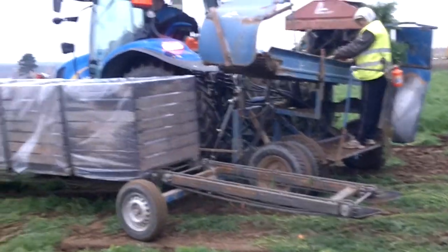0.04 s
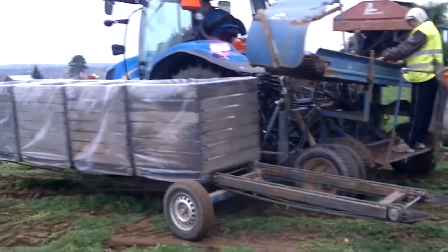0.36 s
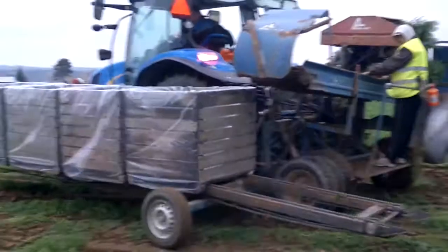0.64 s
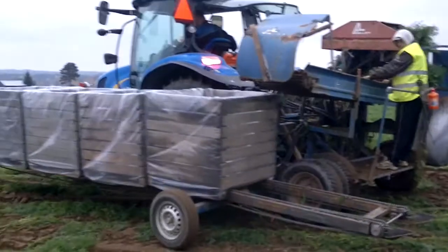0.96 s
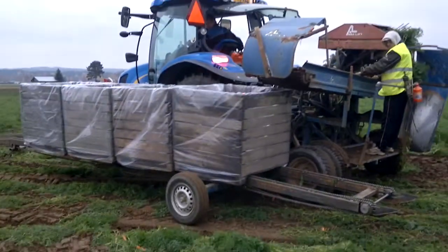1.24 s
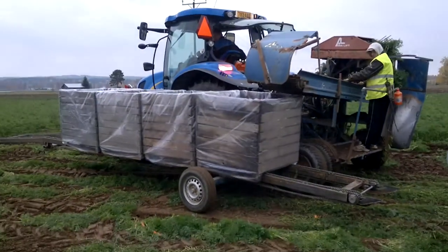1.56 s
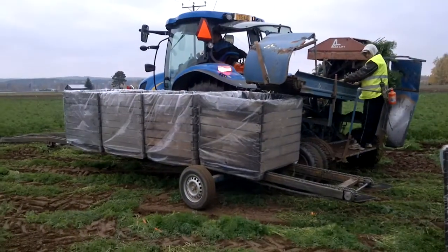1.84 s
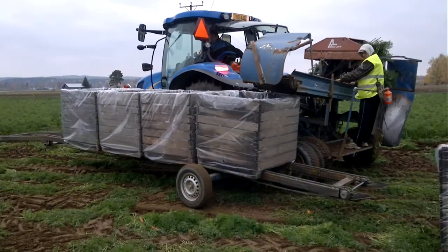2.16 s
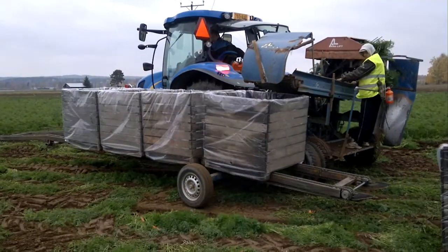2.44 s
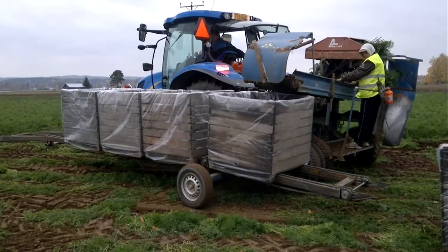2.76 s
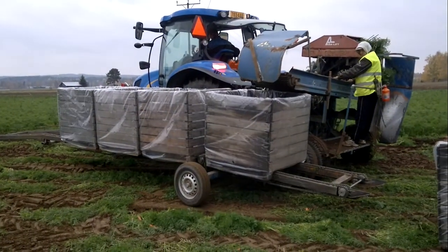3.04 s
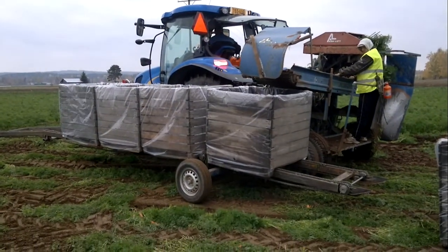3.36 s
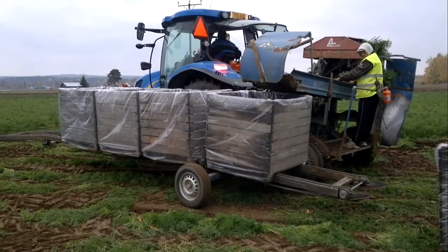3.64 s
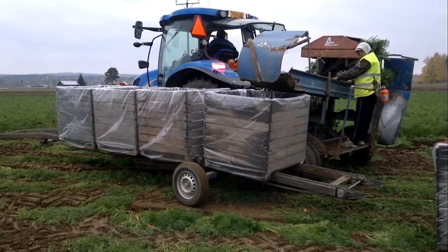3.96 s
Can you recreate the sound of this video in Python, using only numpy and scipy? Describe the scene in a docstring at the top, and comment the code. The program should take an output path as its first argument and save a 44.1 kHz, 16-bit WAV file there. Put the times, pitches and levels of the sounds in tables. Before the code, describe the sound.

A tractor's diesel engine idles and clatters while gusts of wind buffet the microphone.

```python
"""Idling tractor in a gusty field

A few metres away a diesel throbs and clatters, and the belts of its mounted harvester hiss.
Shaken by the engine, a loose steel part chatters and clinks; a clank and two dry ticks join in.
Gusts rumble and buffet on the two microphone ports, mostly on the right one."""
import sys
import numpy as np
from scipy import signal
from scipy.fft import irfft
from scipy.io import wavfile
from scipy.ndimage import uniform_filter1d

SR = 44100
rng = np.random.default_rng(int(sys.argv[2]) if len(sys.argv) > 2 else 0)


def file_out(sig):
    """Save sig as 16-bit WAV at sys.argv[1]."""
    # one column per channel
    cols = np.atleast_2d(sig).T
    # limit, then scale
    lim = np.clip(cols, -1, 1)
    pcm = np.round(lim * 32767).astype(np.int16)
    wavfile.write(sys.argv[1], SR, pcm)


N = 176400
T = np.arange(N) / SR

# The machine's fader moves. Each row: time in seconds, engine clatter in dB, belt hiss in dB.
MACHINE_LEVELS = [(0, -38.5, -43), (0.599, -39, -45.5), (1.2, -34, -41.5), (1.45, -42.5, -46),
                  (1.8, -48.5, -57.5), (2.251, -39, -44.5), (2.8, -39.5, -49.5), (3.6, -42, -52),
                  (4.0, -41.5, -52.5)]


def from_db(db):
    """Decibels to gain."""
    return 10 ** (np.asarray(db) / 20)


def rms_one(x):
    """Scale to unit rms."""
    return x / np.sqrt(np.mean(x ** 2) + 1e-20)


def automation(points):
    """Join (seconds, value) points by straight lines."""
    return np.interp(T, *np.transpose(points))


def at_hz(points, hz):
    """Read a curve on a log-frequency axis."""
    freqs, values = np.transpose(points)
    return np.interp(np.log(hz), np.log(freqs), values)


def drift(rate_hz):
    """Smooth random modulation with a spread of 1."""
    pole = np.exp(-80 * np.pi * rate_hz / SR)
    white = rng.standard_normal(N // 40 + 2002)
    slow = signal.lfilter([1], [1, -2 * pole, pole * pole], white)[2000:]
    return np.interp(np.arange(N) / 40, np.arange(len(slow)), rms_one(slow))


def decay(start, t60):
    """Envelope that jumps to 1, then falls 60 dB in t60 seconds."""
    return (T >= start) * np.exp(-np.log(1000) * np.maximum(T - start, 0) / t60)


def level_out(noise, samples):
    """Ride the gain to take the chance swells out of a noise."""
    return noise / np.sqrt(uniform_filter1d(noise * noise, samples) + 1e-12)


def bands(spectrum, white):
    """Split two white noises into (Hz, band) pairs shaped by a spectrum; total power 1."""
    edges = np.geomspace(20, 16000, 27)
    centres = np.sqrt(edges[1:] * edges[:-1])
    octaves_above = np.maximum(np.log2(centres / spectrum[-1][0]), 0)
    octaves_below = np.maximum(np.log2(spectrum[0][0] / centres), 0)
    density_db = at_hz(spectrum, centres) - 24 * (octaves_above + octaves_below)
    gains = from_db(density_db) * np.sqrt(np.diff(edges))
    gains = gains / np.linalg.norm(gains)
    for k, hz in enumerate(centres):
        if gains[k] > 1e-4:
            bandpass = signal.butter(3, edges[k:k + 2], "band", fs=SR, output="sos")
            yield hz, gains[k] * rms_one(signal.sosfilt(bandpass, white[k % 2]))


def stereo_noise(spectrum, white):
    """Machine noise, centred in the lows and wide higher up."""
    # Stereo image. Each row: frequency in Hz, left-right correlation from -1 to 1.
    correlation = [(700, 0.92), (1200, 0.58), (2000, -0.59), (6500, 0.0094)]
    noise = 0
    for hz, (mid, side) in bands(spectrum, white):
        alike = at_hz(correlation, hz)
        noise += np.sqrt((1 + alike) / 2) * mid + np.sqrt((1 - alike) / 2) * side * [[1], [-1]]
    return noise


def ring(start, hz, t60):
    """One decaying mode, struck with a short contact."""
    contact_s = 0.00029
    attack = np.clip((T - start) / contact_s, 0, 1) ** 2
    return attack * decay(start, t60) * np.sin(2 * np.pi * hz * (T - start))


def dense_modes(spectrum, modes_per_hz=0.032):
    """Many close steel modes at random pitches, each with its own phase on either side."""
    hz = np.arange(N // 2 + 1) * SR / N
    in_range = (hz > spectrum[0][0]) & (hz < spectrum[-1][0])
    present = in_range & (rng.random(len(hz)) < modes_per_hz * SR / N)
    gains = present * from_db(at_hz(spectrum, hz + 1))
    phases = np.exp(2j * np.pi * rng.random((2, len(hz))))
    return rms_one(irfft(gains * phases, N))


def port_rumble(gusts):
    """Turbulence on one port: louder gusts are brighter, and the flow keeps faltering."""
    # Tone of a gust at neutral_db. Each row: frequency in Hz, relative density in dB.
    rumble_spectrum = [(22, -11.5), (50, 0.5), (120, -1.5), (200, -8.5), (350, -20.5), (600, -36),
                       (1200, -45.5)]
    neutral_db, brightening = -9.5, 0.28
    gust_db = automation(gusts)
    flutter_db = 2.5 * np.minimum(drift(20.3), 1)
    tilt_db_per_octave = brightening * (gust_db - neutral_db) + flutter_db
    rumble = 0
    for hz, band in bands(rumble_spectrum, rng.standard_normal((2, N))):
        octaves = np.clip(np.log2(hz / 100), 0, 3)
        rumble += band * from_db(octaves * tilt_db_per_octave)
    return level_out(rumble, samples=1500) * from_db(gust_db + flutter_db)


def buffets():
    """Single eddies thump and flutter on the windward port."""
    # Tone of a thump. Each row: frequency in Hz, relative density in dB.
    thump_spectrum = [(100, -9.5), (220, 5), (400, -3.5), (750, -16.5), (1200, -38)]
    # The eddies. Each row: centre in seconds, level in dB, half-length in seconds.
    eddies = [(0.285, -15, 0.0081), (0.436, -14, 0.0068), (0.468, -19, 0.0064), (0.532, -17, 0.0069),
              (1.178, -26, 0.016), (1.387, -21, 0.052), (1.543, -12, 0.0082), (1.657, -17.5, 0.0094),
              (1.695, -12, 0.024), (2.489, -17, 0.015), (2.533, -16, 0.012), (2.834, -21, 0.015),
              (2.955, -15.5, 0.007), (3.176, -18, 0.008), (3.469, -13.5, 0.016), (3.58, -17, 0.0066),
              (3.607, -12, 0.018), (3.754, -15.5, 0.0076)]
    noise = sum(band for _, band in bands(thump_spectrum, rng.standard_normal((2, N))))
    fluttering = level_out(noise * from_db(6 * drift(86)), samples=450)
    envelope = sum(from_db(db) * np.exp(-2 * ((T - s) / half) ** 4) for s, db, half in eddies)
    return fluttering * envelope


def wind():
    """Gusts rumble on both ports; the right one faces the wind and takes the buffets."""
    # Gusts on the left and right port. Each row: time in seconds, level in dB.
    left_gusts = [(0, -32), (0.12, -32.5), (0.32, -15), (0.6, -45), (0.68, -25.5), (2.0, -26), (2.12, -40),
                  (2.41, -15.5), (2.62, -40), (2.75, -10.5), (2.86, -40.5), (3.65, -37.5), (3.8, -25)]
    right_gusts = [(0, -18), (0.15, -11.5), (0.29, -10.5), (0.39, -21), (0.45, -9), (0.53, -12.5),
                   (0.56, -19.5), (0.62, -22.5), (0.67, -10), (0.76, -20), (0.8, -10), (0.9, -26),
                   (1.1, -21), (1.17, -11.5), (1.7, -11.5), (1.75, -18.5), (1.97, -19.5), (2.14, -27),
                   (2.3, -22), (2.48, -9.5), (2.69, -18.5), (2.78, -14), (3.03, -17), (3.42, -15),
                   (3.6, -9), (3.67, -16.5), (4.0, -15.5)]
    return np.array([port_rumble(left_gusts), port_rumble(right_gusts) + buffets()])


def belts():
    """The harvester's running belts hiss and rustle."""
    # Tone of the hiss. Each row: frequency in Hz, relative density in dB.
    hiss_spectrum = [(1500, -4), (2500, 3.5), (3700, 3), (4900, -5), (6200, -11.5), (7500, -21.5),
                     (11500, -26.5), (15000, -53.5)]
    level_db = automation([(s, db) for s, _, db in MACHINE_LEVELS])
    flicker_db = 1.06 * drift(28)
    hiss = stereo_noise(hiss_spectrum, rng.standard_normal((2, 2, N)))
    return hiss * from_db(level_db + flicker_db)


def ticks():
    """Short dry contacts: a bright resonance over a duller body that dies sooner."""
    # Each row: start in seconds, level in dB, bright pitch in Hz.
    contacts = [(1.5894, -25, 3680), (3.463, -34.5, 2750)]
    return sum(from_db(db) * (ring(s, hz, t60=0.011) + ring(s, hz=1400, t60=0.0046))
               for s, db, hz in contacts)


def frame_clank():
    """A second piece of the frame is struck once and rings."""
    # Its modes. Each row: pitch in Hz, relative level in dB, time to fall 60 dB in seconds.
    modes = [(2206, -35.5, 0.5), (3460, -32.5, 0.23)]
    return sum(from_db(db) * ring(start=2.083, hz=hz, t60=t60) for hz, db, t60 in modes)


def loose_steel():
    """Each blow sets off a buzzing ring, a bright crash and a sizzle; the clank shares their pan."""
    # The blows. Each row: start in seconds, strength in dB, crash boost in dB.
    blows = [(2.081, -27.5, 7), (2.263, -24, -29), (2.3116, -14.5, -3), (2.35, -22.5, 6.5),
             (2.391, -19.5, -6), (2.4331, -13.5, -5), (2.4772, -15.5, -5.5), (2.5182, -15.5, 0),
             (2.5633, -17.5, 3), (2.603, -23.5, -10), (2.8053, -32, 13.5), (2.8643, -37, 10),
             (3.0944, -36, 4.5), (3.2992, -24.5, 4.5), (3.4077, -32, 3)]
    # The part's main modes. Each row: pitch in Hz, relative level in dB.
    modes = [(2632, -15.5), (2885, -23), (2970, -4), (3090, -4.5), (3461, -20.5), (3822, -17), (5426, -25),
             (5652, -29)]
    # Dense upper modes, and tiny contacts between blows. Each row: frequency in Hz, relative level in dB.
    crash_spectrum = [(1500, -6.5), (2700, 6), (3600, 7), (4600, -4.5), (5900, 1), (7400, -22),
                      (15000, -37)]
    sizzle_spectrum = [(3200, 0.5), (11700, -4), (15000, -25)]
    ring_trim_db, crash_trim_db, sizzle_trim_db = -4.5, -13, -23.5
    crash_attack_s, buzz_hz = 0.0014, 96
    pan_db, right_lag_s = 1.2, 0.0001
    clink = sum(from_db(db + ring_trim_db) * ring(0, hz, t60=0.23) for hz, db in modes)
    crash_shape = np.minimum(T / crash_attack_s, 1) * decay(0, t60=0.13)
    ringing, crash_power, sizzle_power = np.zeros((3, N))
    for s, strength_db, boost_db in blows:
        start = int(s * SR)
        ringing[start:] += from_db(strength_db) * clink[:N - start]
        crash_gain = from_db(strength_db + boost_db + crash_trim_db)
        crash_power[start:] += (crash_gain * crash_shape[:N - start]) ** 2
        sizzle_gain = from_db(2 * strength_db + sizzle_trim_db)   # only hard blows shake much
        sizzle_power += (sizzle_gain * decay(s, t60=0.35)) ** 2
    buzz = 1 + 0.29 * drift(buzz_hz)   # the part rattles in its loose seat
    ringing = ringing * buzz + frame_clank()
    stereo_ring = np.array([ringing, np.interp(T - right_lag_s, T, ringing)])
    flicker_db = 2 * drift(buzz_hz)
    sizzle = np.sqrt(sizzle_power) * from_db(flicker_db) * dense_modes(sizzle_spectrum)
    crash = np.sqrt(crash_power) * dense_modes(crash_spectrum)
    return (stereo_ring + crash + sizzle) * from_db([[-pan_db], [pan_db]])


def diesel():
    """Low exhaust tones under clatter that partly repeats each engine cycle and swells at each firing."""
    # Exhaust tones. Each row: pitch in Hz, mid level in dB.
    exhaust_tones = [(47.7, -38), (95.4, -44.5), (327, -53)]
    # Tone of the clatter. Each row: frequency in Hz, relative density in dB.
    clatter_spectrum = [(60, 13.5), (300, 7.5), (450, -5), (750, 5.5), (1300, -5.5), (1950, 3),
                        (2500, -34.5)]
    firing_hz, firings_per_cycle, speed_wander = 47.48, 4, 0.003
    repeating_share, knock_depth = 0.22, 0.077
    clock = T + np.cumsum(speed_wander * drift(1.5)) / SR
    cycle_sample = (clock % (firings_per_cycle / firing_hz) * SR).astype(int)
    repeating = np.sqrt(repeating_share) * rng.standard_normal((2, 2, N))[..., cycle_sample]
    fresh = np.sqrt(1 - repeating_share) * rng.standard_normal((2, 2, N))
    clatter = stereo_noise(clatter_spectrum, repeating + fresh)
    knock = 1 + knock_depth * np.cos(2 * np.pi * firing_hz * clock)
    clatter_db = automation([(s, db) for s, db, _ in MACHINE_LEVELS])
    exhaust = 0
    for hz, db in exhaust_tones:
        swell_db = 4.9 * drift(0.43)
        exhaust += from_db(db + swell_db) * np.sqrt(2) * np.sin(2 * np.pi * (hz * clock + rng.random()))
    return clatter * knock * from_db(clatter_db) + exhaust


def scene():
    """Wind on the ports, the machine ahead."""
    return wind() + diesel() + belts() + loose_steel() + ticks()


def record(dry):
    """Soft-clip the hardest peaks and cut the very top."""
    rounded = dry / (1 + dry ** 4) ** 0.25
    high_cut = signal.cheby2(12, 70, 15600, fs=SR, output="sos")
    return signal.sosfilt(high_cut, rounded)


dry = scene()
out = record(dry)
file_out(out)
```